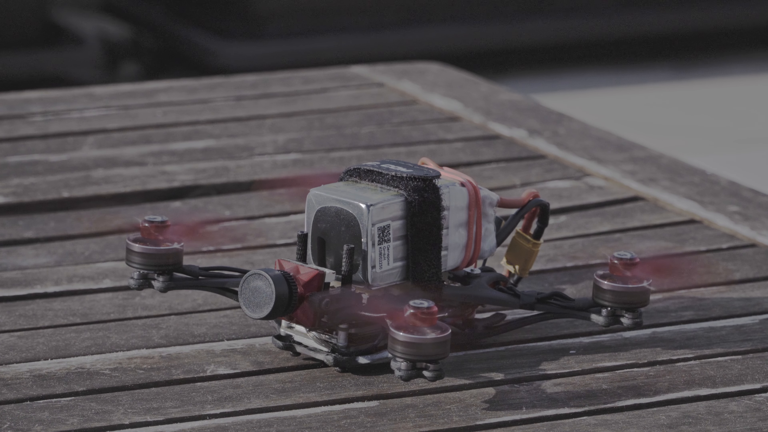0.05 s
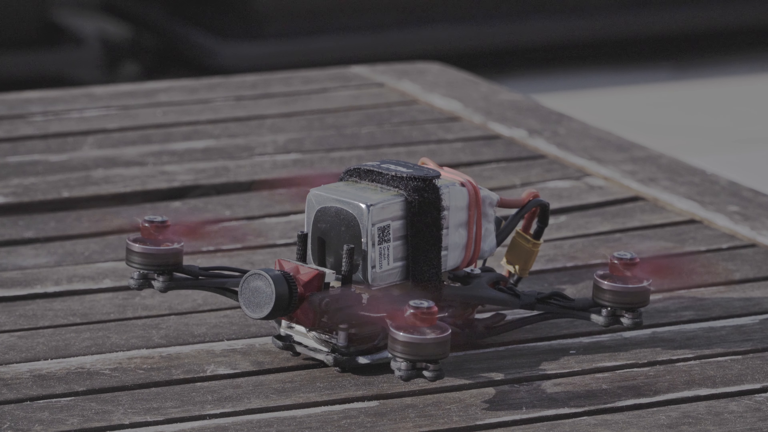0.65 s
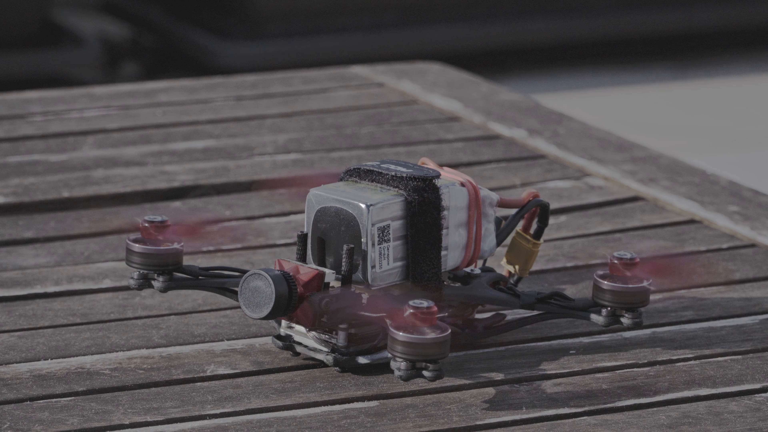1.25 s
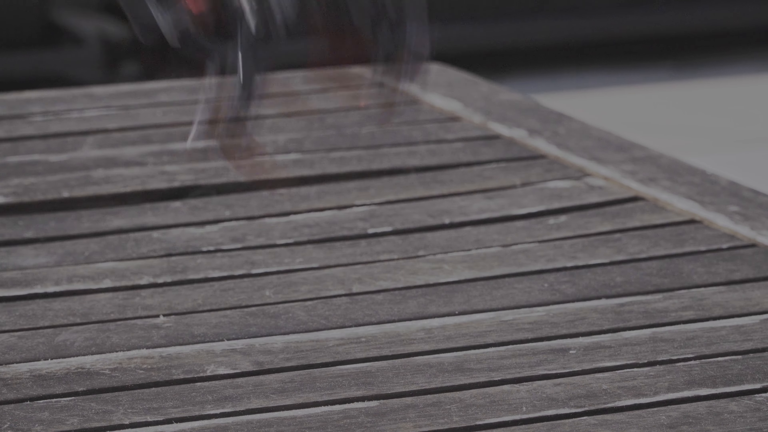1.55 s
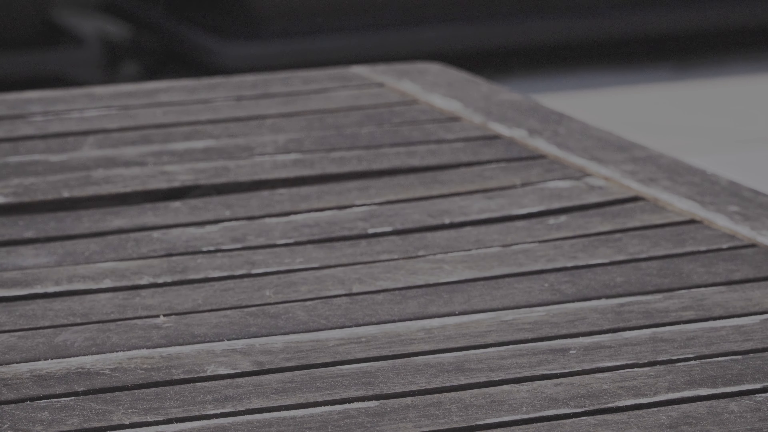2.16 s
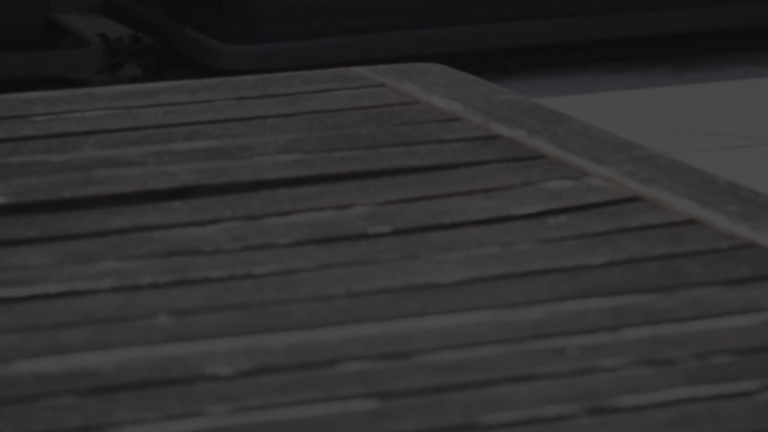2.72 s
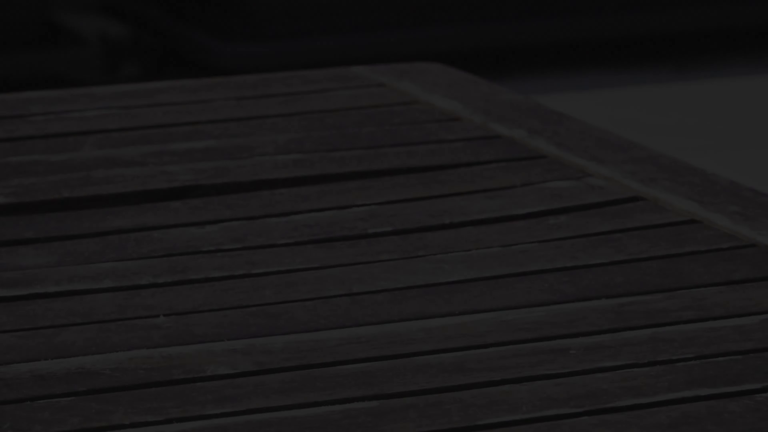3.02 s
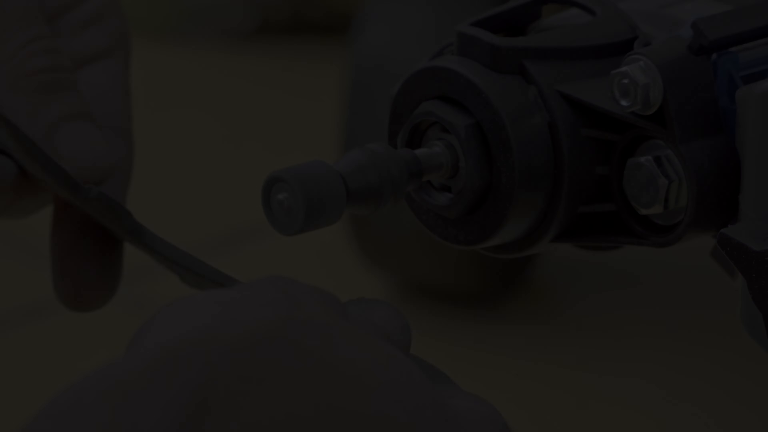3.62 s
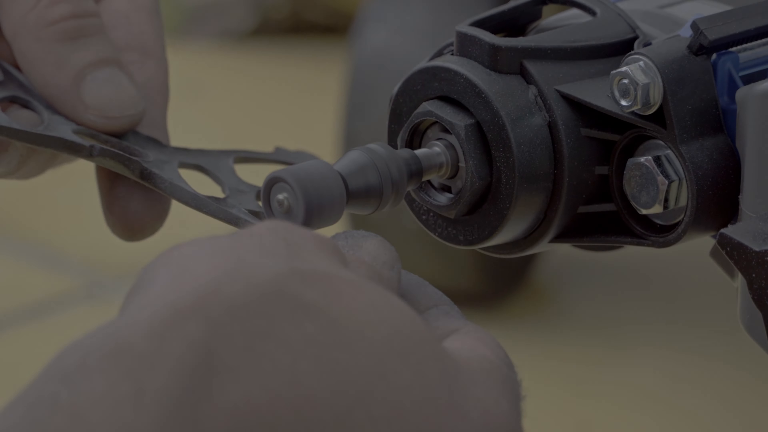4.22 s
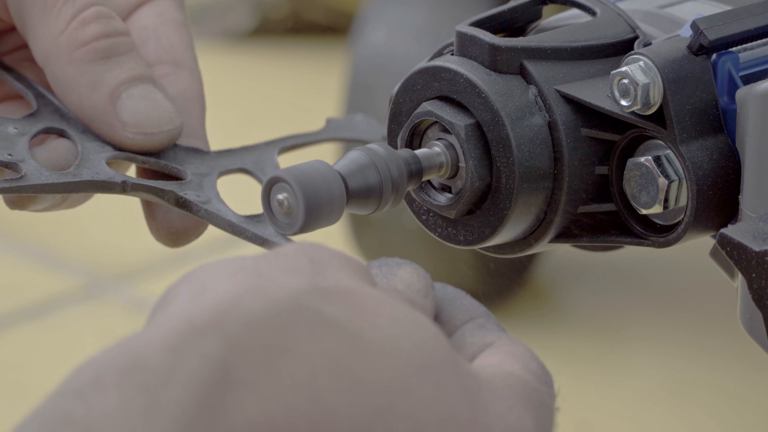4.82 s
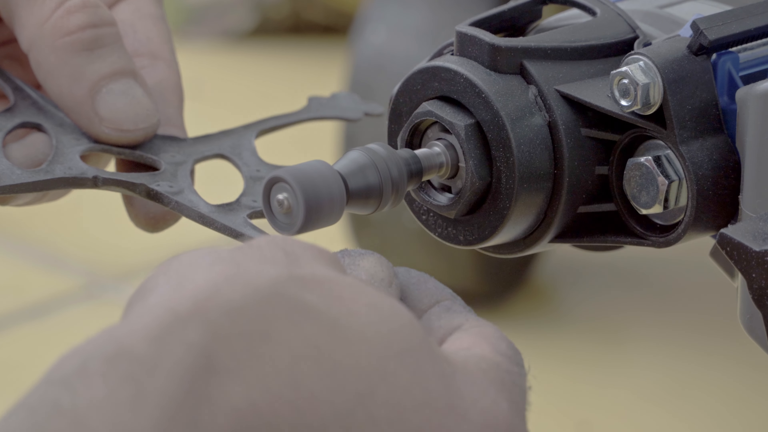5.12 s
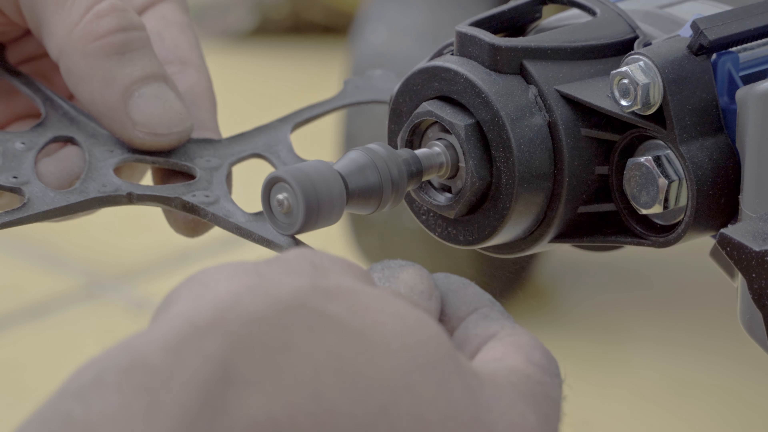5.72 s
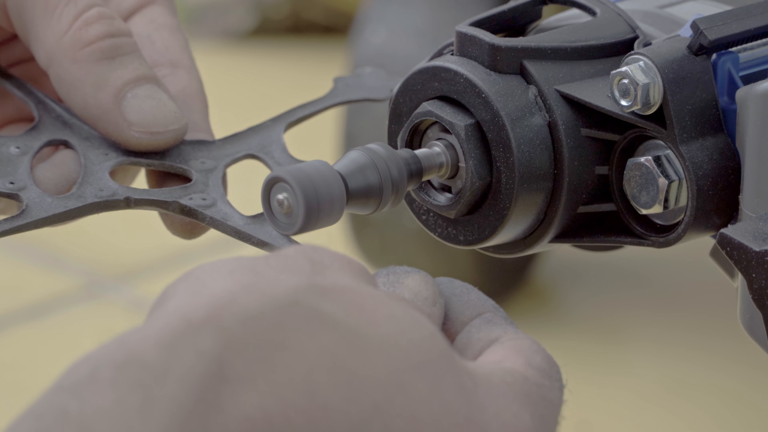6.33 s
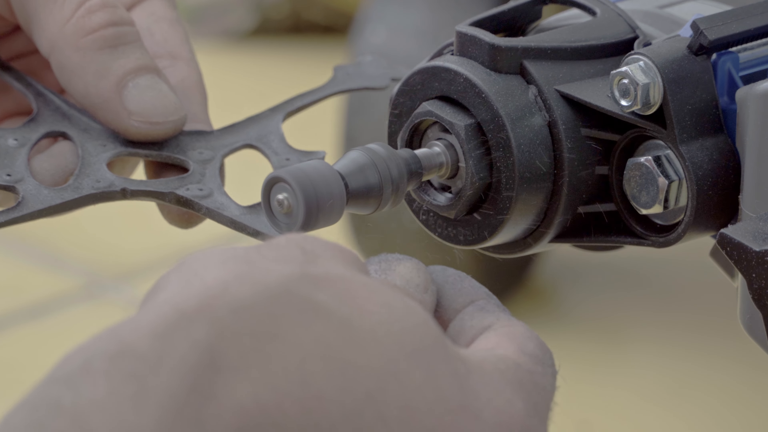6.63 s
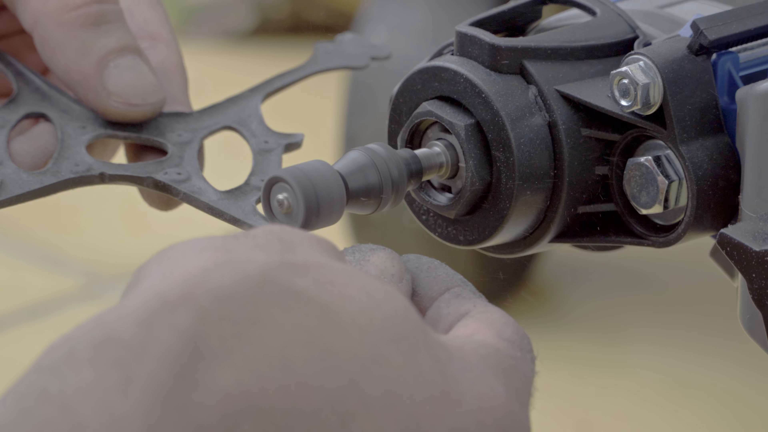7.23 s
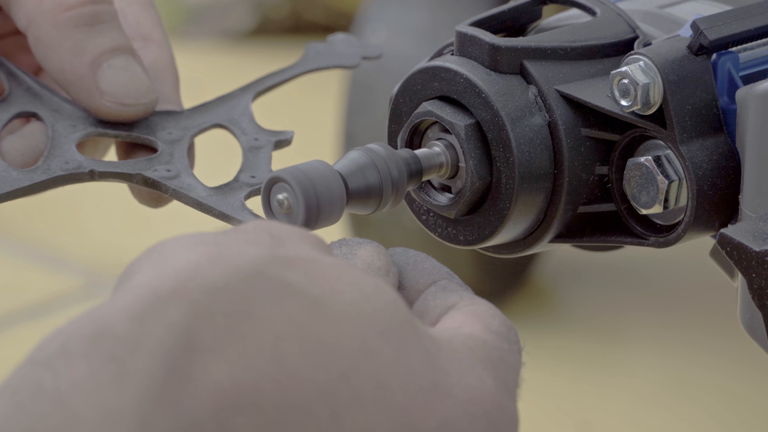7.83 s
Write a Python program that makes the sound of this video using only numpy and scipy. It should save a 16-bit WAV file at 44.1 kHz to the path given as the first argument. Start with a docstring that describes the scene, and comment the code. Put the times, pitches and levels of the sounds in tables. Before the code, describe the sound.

A small drone idles, spins up, blasts off and crashes; then a whining rotary tool sands a carbon fiber part in repeated pushes.

```python
"""A small racing drone ticks at idle on a garden table while a small bird twitters. The blades spin up,
hissing and singing; it leaps away in a blast of downwash and crashes with three knocks and a clatter.
Then, abruptly, a workshop: a rotary tool whines at multiples of its shaft rate over its cooling air.
A carbon fibre frame is pushed against the sanding drum; the motor sags, and the part buzzes and
rings under the grit."""
import sys
import numpy as np
from scipy import signal
from scipy.fft import rfft, irfft, next_fast_len
from scipy.io import wavfile

SR = 44100
rng = np.random.default_rng(int(sys.argv[2]) if len(sys.argv) > 2 else 0)


def to_wav(sig):
    """Store sig (one row per channel, or 1-D mono) as 16-bit WAV at the path in sys.argv[1].

    Samples outside -1..1 are clipped; the rate is SR.
    """
    pcm = np.clip(np.atleast_2d(sig), -1, 1) * 32767
    pcm = np.round(pcm).astype(np.int16)
    wavfile.write(sys.argv[1], SR, pcm.T)  # frames by channels


N = 346626
T = np.arange(N) / SR

# noise spectra: freq_hz, relative_db
GARDEN_AIR = [(25, -9.5), (60, -2.5), (110, -3), (200, -14.5), (450, -18), (700, -18), (1100, -15),
              (1400, -29), (2500, -32.5), (5000, -36), (8000, -53.5), (14000, -55.5)]
IDLE_TICKS = [(40, -30), (130, -13), (200, -20), (450, -9), (750, -2), (1130, -7), (1350, -22), (2000, -16),
              (3500, -28), (5500, -22), (6800, -38), (9000, -40), (11100, -22), (12500, -44)]
BLADE_HISS = [(180, -21), (300, -5.5), (756, -12.5), (1330, -14), (2040, -10.5), (2980, -3.5), (3450, -17),
              (4140, -6), (8700, -24.5), (11300, -13.5), (15500, -37)]
DOWNWASH = [(41, -66), (70, -44), (129, -8.5), (173, -22.5), (284, -18), (356, -4), (686, -8.5), (1260, -9),
            (1450, -2), (2270, -10), (3050, -11.5), (3910, -11.5), (5480, -11), (15500, -16.5)]
IMPACT_CRACK = [(60, -36), (150, -18.5), (600, -3), (1500, 4.5), (2800, 13), (4000, -1.5), (7000, -18),
                (15000, -45)]
SKID_SCUFF = [(47, -45), (80, -22), (124, 7), (206, -15.5), (350, -1.5), (649, 0), (809, -11), (1080, -2.5),
              (1530, -24.5), (2660, -4), (3870, -18), (9760, -15), (15500, -27)]
COOLING_AIR = [(25, -10), (60, -3), (150, -6), (400, -6), (620, -12), (900, -4.5), (1250, -15.5),
               (1900, -9.5), (2400, 4.5), (3400, -7.5), (5800, 2), (8000, -1), (10800, -1.5), (15500, -7.5)]
DUST_HISS = [(40, -13), (130, -9), (250, -4), (700, -8.5), (1200, -9.5), (2200, 10), (3500, 2), (7000, 2.5),
             (11000, 4.5), (15500, 0)]
# resonances: centre_hz, width_hz, relative_db
NEIGHBOURHOOD_TONES = [(704, 44, -10.5), (1130, 36, 2), (1040, 70, -8.5)]
DRONE_MODES = [(464, 150, -10.5), (750, 38, -0.5), (1020, 140, -4), (1570, 150, -8.5), (1920, 180, -4),
               (2610, 110, -6), (2967, 150, -3), (3270, 80, -13.5), (4190, 330, -2.5), (5360, 340, -4.5),
               (7350, 400, -24.5), (11000, 450, -12.5)]
HOUSING_MODES = [(269, 37, 4.5), (329, 97, 4), (411, 12.5, 3), (500, 42, -26), (800, 10, -5),
                 (1537, 144, -3.5), (2740, 310, 2), (3130, 82, -3.5), (3910, 480, 10.5), (4770, 80, -16),
                 (5960, 640, 12), (10350, 200, 8.5), (11440, 190, 5)]
CARBON_MODES = [(501, 16, -13), (759, 42, -8.5), (980, 60, -12), (1655, 13, -2.5), (1810, 74, -6),
                (2212, 36, -2), (2460, 64, 1.5), (2638, 80, 8.5), (2620, 120, -19), (3950, 350, -6)]
# likeness of the two channels: freq_hz, correlation
OUTDOOR_LIKENESS = [(60, 0.95), (180, 1), (550, 0.95), (1650, 0.8), (4970, 0.2), (15000, 0.66)]
INDOOR_LIKENESS = [(60, 1.0), (150, 0.98), (380, 1), (950, 0.71), (2380, 0.84), (5980, 0.44), (15000, 0.23)]

# wind puffs: centre_s, length_s, level_db
GUSTS = [(2.664, 0.095, -65.5), (2.763, 0.08, -51.5), (2.976, 0.077, -61), (3.067, 0.095, -59),
         (3.189, 0.089, -60.5)]
# arched bird notes: start_s, length_s, top_hz, relative_db
CHIRPS = [(0.045, 0.12, 6830, -68), (0.493, 0.048, 6020, -60), (0.546, 0.039, 6020, -59),
          (.656, 0.053, 4900, -72), (1.008, .057, 5920, -62), (1.072, .028, 6150, -63),
          (1.95, 0.043, 5970, -59), (1.993, 0.057, 6000, -62), (2.599, 0.052, 5750, -62.5),
          (2.652, 0.037, 6230, -69), (2.703, .045, 4930, -71), (2.757, .046, 4550, -71),
          (2.817, 0.068, 4650, -77.5), (3.374, 0.052, 5940, -65)]
# falling bird notes: start_s, relative_db
PIPS = [(2.683, -70), (2.811, -72), (2.968, -72.5)]
# propeller speed: time_s, blade_rate_hz
BLADE_RATE = [(.95, 913), (1.2, 986), (1.48, 1059), (1.537, 754), (1.6, 686), (1.87, 693)]
# blade tones: blade_rate_multiple, relative_db
BLADE_ORDERS = [(1, -18.5), (2, 2.5), (3, -3), (4, -5), (6, -18.5)]
# crash blows: start_s, relative_db, grit_re_blow_db, brightness_hz
KNOCKS = [(1.8762, -.5, -23, 1950), (2.0395, -2.5, -14.5, 3970), (2.0478, -9, -21, 3380),
          (2.081, -5, -7.5, 6400), (2.143, -12, -28, 1450), (2.1915, -22.5, -13, 3050),
          (2.2494, -23, 1, 1450), (2.263, -21.5, -5, 980), (2.29, -19, -7, 3830), (2.295, -27, -6, 3980),
          (2.33, -29, 0, 3560), (2.370, -25, 1, 1220), (2.516, -32, -10, 3120)]
# modes of the struck object: pitch_hz, relative_db, t60_s
STRUCK_MODES = [(133, -26.5, .25), (414.5, -10.5, 0.032), (666, -20.5, 0.095), (913, -5, 0.06),
                (1087, 2, 0.034), (1194, -3.5, 0.023), (1460, -5.5, 0.042), (1650, 4.5, 0.0178),
                (1866, 2.5, 0.022), (2120, 3.5, 0.023), (2290, -3.5, 0.058), (2726, 0.5, 0.023),
                (3005, 2, 0.031), (3230, -9.5, 0.044), (4170, 1, .025)]
# garden echo decay: freq_hz, t60_s
GARDEN_DECAY = [(150, 0.19), (1000, 0.28), (2200, 0.31), (5000, 0.15), (14000, 0.21)]
# skids of the wreck: start_s, length_s, level_db
SKIDS = [(2.057, 0.3, -50), (2.255, 0.021, -38), (2.364, 0.018, -43), (2.372, 0.12, -53)]

# tool speed: time_s, shaft_hz
SHAFT_RATE = [(3.44, 527.2), (3.78, 518.3), (3.89, 527.6), (4.46, 510.7), (4.64, 459.5), (4.93, 499.5),
              (5.38, 527.1), (5.47, 515.4), (5.72, 455.1), (5.76, 472.0), (5.98, 500.9), (6.45, 520.1),
              (6.66, 480.3), (6.77, 488.9), (7.03, 471.8), (7.48, 504.4), (7.52, 486.0), (7.85, 506.2)]
# motor whine: shaft_multiple, free_running_db, change_per_load_db
WHINE_ORDERS = [(0.991, -24.5, 10), (4.035, -7.5, -16), (4.97, -4.5, -12.5), (5.99, -6, -7.5),
                (6.96, -17.5, -13), (8, 0.5, -6), (8.88, -9.5, -.5), (10.01, -1.5, -4), (12.026, 2.5, -3),
                (14.05, -3.5, -2.5), (16, -12, -3), (18.02, -1, -17), (20.03, -.5, -12), (21.96, -12, -2),
                (25.4, -16, -3), (28, -19, -1)]
# mains hum: pitch_hz, level_db
MAINS_HUM = [(100, -70.5), (200, -53), (300, -53), (400, -61)]
# pushes against the drum: start_s, length_s, contact_db, dust_db
PUSHES = [(4.159, 0.052, -36.5, -40.5), (4.41, 0.37, -38.5, -37), (5.381, 0.37, -35, -36.5),
          (6.444, 0.34, -34.5, -39.5), (6.743, 0.47, -40.5, -39.5), (7.205, 0.28, -37.5, -40),
          (7.473, 0.14, -39.5, -43), (7.587, 0.031, -33, -39.5)]
# low buzz at multiples of the throb rate: throb_rate_multiple, relative_db
BUZZ_ORDERS = [(8, -5), (12, 0), (13, 3.5), (14, -7), (16, -0.5), (19, -4.5), (24, -3), (26, 8)]

WORKSHOP_START_S, BAND_LIMIT_HZ = 3.4255, 15950


def amp(db):
    """Decibels to gain."""
    return 10 ** (np.asarray(db) / 20)


def unit(x):
    """Scale to rms 1."""
    return x / np.sqrt(np.mean(x ** 2) + 1e-20)


def curve(rows):
    """Rows of (time_s, value) read at every sample."""
    return np.interp(T, *np.transpose(rows))


def across(points, hz):
    """Rows of (freq_hz, value) read on a log axis."""
    freq_hz, value = np.transpose(points)
    return np.interp(np.log(hz + 1), np.log(freq_hz + 1), value)


def envelope(start_s, length_s, rise_s, fade_s):
    """Smooth rise, hold until start_s + length_s, exponential fade."""
    rise = np.sin(np.pi / 2 * np.clip((T - start_s) / rise_s, 0, 1)) ** 2
    return rise * np.exp(-np.maximum(T - start_s - length_s, 0) / fade_s)


def add(mix, start_s, sound):
    """Mix a sound in, in place."""
    part = mix[..., max(round(start_s * SR), 0):][..., :sound.shape[-1]]
    part += sound[..., :part.shape[-1]]


def shaped(x, response):
    """Filter by a function of frequency; rms 1."""
    size = next_fast_len(N, True)
    return unit(irfft(rfft(x, size) * response(np.fft.rfftfreq(size, 1 / SR)), size)[..., :N])


def tint(x, spectrum):
    """Colour by a spectrum in dB; rms 1."""
    return shaped(x, lambda hz: amp(across(spectrum, hz)))


def peaks(x, modes):
    """Colour by resonances with deep valleys between them; rms 1."""
    return shaped(x, lambda f: np.sqrt(sum(
        amp(2 * db) / width_hz / (1 + (1.9 * (f - hz) / width_hz) ** 2) ** 2
        for hz, width_hz, db in modes)))


def ring(x, modes):
    """Drive resonators, each with its own share of the power; rms 1."""
    return unit(sum(
        amp(db) / np.sqrt(width_hz) * signal.lfilter(*signal.iirpeak(hz, hz / width_hz, SR), x)
        for hz, width_hz, db in modes))


def wander(rate_hz):
    """Slow random motion; rms 1."""
    knots = rng.standard_normal(8192)
    return unit(np.interp(T * rate_hz, np.arange(len(knots)), knots))


def stereo_noise(likeness, grains=0.):
    """Two partly alike noise channels; grains makes them spiky."""
    noise = rng.standard_normal((2, N)) * np.exp(grains * rng.standard_normal((2, N)))
    signs = np.array([[1], [-1]])
    mid, side = shaped(noise, lambda hz: np.sqrt(1 + signs * np.clip(across(likeness, hz), 0, .998)))
    return unit(np.array([mid + side, mid - side]))


def pan(left_db):
    """Channel gains, left over right by left_db."""
    return amp(np.array([[.5], [-.5]]) * left_db)


def echoes(x, t60s, likeness):
    """Sparse stereo reflections; each band decays at its own rate."""
    shape = (3, SR * 3 // 4)
    taps = rng.standard_normal(shape) * (rng.random(shape) < .08)
    stereo_taps = np.sqrt(likeness) * taps[0] + np.sqrt(1 - likeness) * taps[1:]
    hz, t, bands = signal.stft(stereo_taps, SR, nperseg=256)
    decay = np.exp(-np.log(1000) * t / across(t60s, hz)[:, None])
    tail = signal.istft(bands * decay, SR, nperseg=256)[1]
    return signal.fftconvolve(np.atleast_2d(x), tail / np.linalg.norm(tail[0]), axes=1)[:, :N]


def sharp_click(spectrum, size):
    """Minimum-phase click with this spectrum; energy 1."""
    log_gain = np.log(amp(across(spectrum, abs(np.fft.fftfreq(size, 1 / SR)))))
    click = np.fft.ifft(np.exp(np.conj(signal.hilbert(log_gain)))).real
    return click / np.linalg.norm(click)


def garden():
    """Quiet outdoor air, far steady tones and small puffs of wind."""
    puffs = sum(amp(db) * np.exp(-(2 * (T - centre_s) / length_s) ** 2)
                for centre_s, length_s, db in GUSTS)
    wind = tint(stereo_noise(OUTDOOR_LIKENESS),
                [(25, -18), (55, -4.5), (90, -5.5), (125, -12.5), (200, -32.5), (1000, -80)])
    air = amp(-69) * tint(stereo_noise(OUTDOOR_LIKENESS), GARDEN_AIR)
    far_tones = amp(-68.5) * peaks(stereo_noise(OUTDOOR_LIKENESS), NEIGHBOURHOOD_TONES)
    return air + far_tones + puffs * wind


def drone_idle(until_s=1.33, fade_s=.14):
    """Idling motors tick through the frame's resonances; their drive whistles."""
    idling = amp(-55.5) * np.exp(-np.maximum(T - until_s, 0) / fade_s)
    ticks = stereo_noise(OUTDOOR_LIKENESS, grains=.5) * amp(1.2 * wander(500))
    motors = amp(-3.5) * tint(ticks, IDLE_TICKS) + amp(-4.5) * peaks(ticks, DRONE_MODES)
    drive_hz = 5266 + 14 * wander(40.1)
    drive_gain = amp(-62.5) * envelope(start_s=.19, length_s=.81, rise_s=.06, fade_s=.012)
    whistle = drive_gain * np.sin(2 * np.pi * np.cumsum(drive_hz) / SR)
    return pan(.5) * (idling * motors + whistle)


def bird(foot_share=.74, pip_s=.016):
    """Arched notes from the two sides of a syrinx, and falling pips; the trees echo softly."""
    song = np.zeros(N)
    for start_s, length_s, top_hz, db in CHIRPS:
        arch = np.sin(np.linspace(0, np.pi, int(length_s * SR))).clip(0)
        pitch_hz = top_hz * (foot_share + (1 - foot_share) * arch)
        phase = 2 * np.pi * np.cumsum(pitch_hz) / SR
        add(song, start_s, amp(db) * np.sqrt(arch) * (np.sin(phase) + .7 * np.sin(.945 * phase)))
    pip_hz = np.linspace(3200, 2320, int(pip_s * SR))
    pip = np.hanning(len(pip_hz)) * np.sin(2 * np.pi * np.cumsum(pip_hz) / SR)
    for start_s, db in PIPS:
        add(song, start_s, amp(db) * pip)
    song *= amp(2.5 * wander(300))  # tremble
    return amp(1.5) * song + amp(-3.5) * echoes(song, [(2000, .66), (7000, .69)], likeness=.35)


def drone_flight():
    """Blades hiss and sing as the throttle opens; the leap adds downwash and louder tones."""
    throttle = envelope(start_s=.903, length_s=.73, rise_s=.61, fade_s=.026)
    leap = dict(start_s=1.483, length_s=.078, rise_s=.067)
    tones = np.zeros(N)
    for propeller in range(4):  # nearest first, loudest
        waver = 1 + .007 * (1 + propeller) * wander(25) + .0098 * wander(400)
        phase = 2 * np.pi * np.cumsum(curve(BLADE_RATE) * waver) / SR
        tones += amp(-5 * propeller) * sum(amp(db) * np.cos(order * phase) for order, db in BLADE_ORDERS)
    tone_gain = amp(-52.5) * throttle + amp(-30.5) * envelope(**leap, fade_s=.039)
    hiss = amp(-44.5) * throttle * tint(stereo_noise(OUTDOOR_LIKENESS, grains=.5), BLADE_HISS)
    blast = amp(-19) * envelope(**leap, fade_s=.036)
    downwash = blast * tint(stereo_noise(OUTDOOR_LIKENESS), DOWNWASH) * amp(2.2 * wander(700))
    return pan(.5) * hiss + pan(.2) * (downwash + tone_gain * unit(tones))


def knocks(contact_cycles=6.01, grit_fade_s=.0083):
    """Each blow: a crack, a short ring, a spray of grit. Softer contacts are slower and duller."""
    t = np.arange(SR // 5) / SR
    crack = amp(-3.5) * sharp_click(IMPACT_CRACK, len(t))
    blows = np.zeros(N)
    for start_s, db, grit_db, brightness_hz in KNOCKS:
        rise_s = contact_cycles / brightness_hz
        onset = 1 - np.exp(-(t / rise_s) ** 2)
        ringing = np.zeros(len(t))
        for hz, mode_db, t60_s in STRUCK_MODES:
            decay = amp(mode_db + 1.06 * rng.standard_normal()) * np.exp(-np.log(1000) * t / t60_s)
            ringing += decay * np.sin(2 * np.pi * (hz * t + rng.random()))
        body = onset * ringing / np.linalg.norm(ringing) + np.roll(crack, int(rise_s * SR))
        body = signal.lfilter(*signal.butter(2, brightness_hz, fs=SR), body)
        grit = signal.lfilter(*signal.butter(1, 5500, fs=SR), rng.standard_normal(len(t)))
        grit *= onset * np.exp(-t / grit_fade_s)
        add(blows, start_s, amp(db + 9) * (body + amp(grit_db) * grit / np.linalg.norm(grit)))
    return blows


def crash():
    """Off to the left, the blows echo and the wreck skids."""
    blows = knocks()
    skidding = sum(amp(db) * envelope(start_s, length_s, .548 * length_s, .34 * length_s)
                   for start_s, length_s, db in SKIDS)
    friction = stereo_noise(OUTDOOR_LIKENESS, grains=.453) * amp(2.3 * wander(150))
    slide = skidding * tint(friction, SKID_SCUFF)
    echo = amp(-6) * echoes(blows, GARDEN_DECAY, likeness=.54)
    left, right = pan(6.5) * (blows + echo) + pan(1.9) * slide
    return np.array([left, np.roll(right, 4)])  # far ear lags


def tool_motor(shaft_hz, load, throb_phase, smear_hz=170):
    """Shaft orders smeared by turbulence, and cooling air through the housing; both throb."""
    jitter = 1 + .002 * wander(16) + .001553 * wander(70) + .0011 * wander(500)
    shaft_phase = 2 * np.pi * np.cumsum(shaft_hz * jitter) / SR
    turbulence = shaped(rng.standard_normal((4, N)), lambda hz: (1 + (hz / smear_hz) ** 2) ** -.9)
    smear = (turbulence[:2] + 1j * turbulence[2:]) / np.sqrt(2)
    smear = smear + .04 * smear[::-1]  # channels barely alike
    whine = np.zeros((2, N))
    for order, db, load_db in WHINE_ORDERS:
        roughness = np.roll(smear, rng.integers(N), axis=1) * .88 * (order / 12) ** .55
        partial = amp(db + load_db * load) * np.exp(1j * order * shaft_phase)
        whine += (partial * (amp(2.5 * wander(45)) + roughness)).real
    air = amp(-42) * tint(stereo_noise(INDOOR_LIKENESS), COOLING_AIR)
    air += amp(-43.5) * peaks(stereo_noise(INDOOR_LIKENESS), HOUSING_MODES)
    throb = 1 + .2 * np.cos(throb_phase)
    return pan(-.25) * throb * (amp(-45.5) * whine + amp(-load) * air)


def mains_hum():
    """Mains harmonics, each wavering in level."""
    return sum(amp(db + 1.3 * wander(8.7)) * np.sqrt(2) * np.sin(2 * np.pi * (hz * T + rng.random()))
               for hz, db in MAINS_HUM)


def push_gains():
    """Contact and dust gains: each push rises, holds and lets go; the dust is slower."""
    contact, dust = np.zeros(N), np.zeros(N)
    for start_s, length_s, contact_db, dust_db in PUSHES:
        contact = np.maximum(contact, amp(contact_db) * envelope(start_s, length_s, .02, .037))
        dust = np.maximum(dust, amp(dust_db) * envelope(start_s, length_s, .068, .073))
    return contact, dust


def sanding(shaft_phase, load, throb_phase, groan_band_hz=(757, 963)):
    """The part buzzes on the drum; grit scrapes it, ringing its modes and throwing dust."""
    pulses = np.exp(2 * (np.cos(throb_phase + .4 * wander(50)) - 1)) * amp(2 * wander(70))
    ripple = 1 + .45 * np.cos(shaft_phase)
    contact = unit((.5 + pulses) * ripple)
    scrape = contact * stereo_noise([(500, 1), (3000, .74), (8000, .7)], grains=.6)
    ringing = ring(scrape, CARBON_MODES)
    ringing = tint(ringing, [(200, 14), (500, -11), (3000, 3.5), (4500, -9), (9000, -9)])
    buzz = unit(sum(amp(db + 3.5 * wander(25)) * np.cos(order * throb_phase + .9 * wander(40))
                    for order, db in BUZZ_ORDERS))
    dust = tint(stereo_noise(INDOOR_LIKENESS, grains=.84) * (contact + 6.8), DUST_HISS)
    low_modes = unit(signal.lfilter(*signal.butter(2, groan_band_hz, "bandpass", fs=SR), ringing))
    groan = amp(-16.5) * load * low_modes
    contact_gain, dust_gain = push_gains()
    buzz_gain = amp(-14.5) * np.sqrt(contact_gain * dust_gain)
    return pan(-.24) * (contact_gain * ringing + buzz_gain * buzz + dust_gain * (groan + dust))


def workshop(cycles_per_throb=8.02, full_load_sag_hz=45):
    """Motor and sanding share one speed curve; its sag sets the load."""
    shaft_hz = curve(SHAFT_RATE)
    shaft_phase = 2 * np.pi * np.cumsum(shaft_hz) / SR
    throb_phase = shaft_phase / cycles_per_throb
    load = np.clip((shaft_hz.max() - shaft_hz) / full_load_sag_hz, 0, 1.3)
    motor = tool_motor(shaft_hz, load, throb_phase)
    return motor + mains_hum() + sanding(shaft_phase, load, throb_phase)


def scene():
    """The garden, then abruptly the workshop."""
    indoors = workshop()
    outdoors = garden() + bird() + drone_idle() + drone_flight() + crash()
    switch = np.clip((T - WORKSHOP_START_S) / .0013, 0, 1)
    return (1 - switch) * outdoors + switch * indoors


def record(dry):
    """Steep low-pass on the top treble."""
    lowpass = signal.firwin(511, BAND_LIMIT_HZ, window=("kaiser", 9), fs=SR)
    return signal.oaconvolve(dry, lowpass[None], "same")


dry = scene()
out = record(dry)
to_wav(out)
```